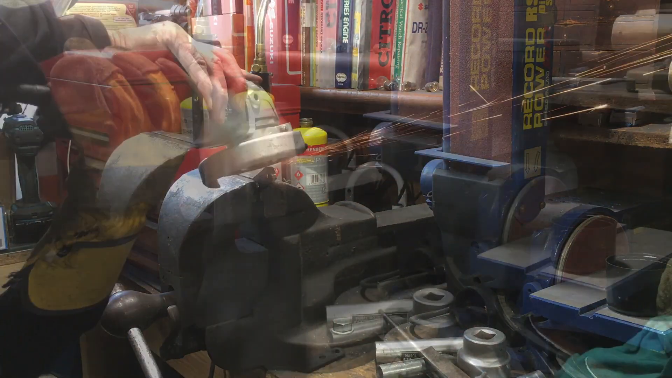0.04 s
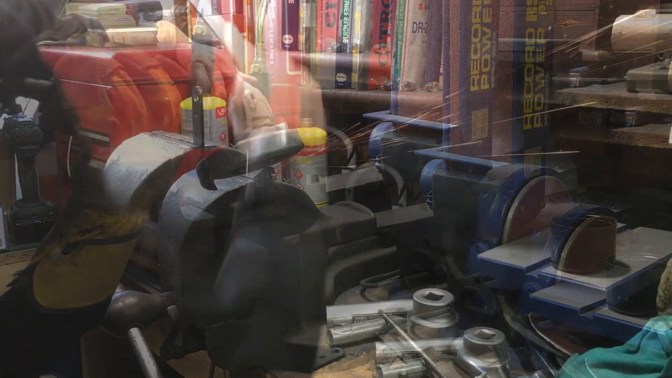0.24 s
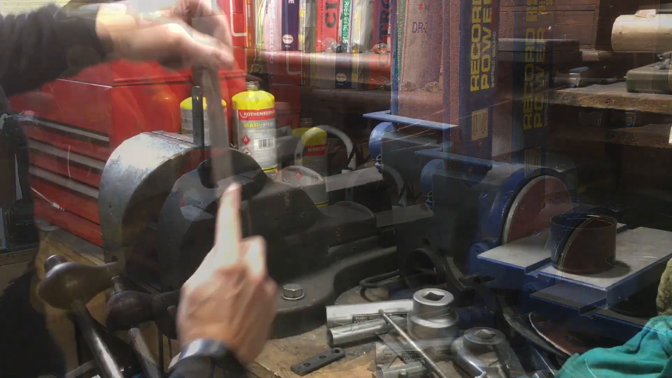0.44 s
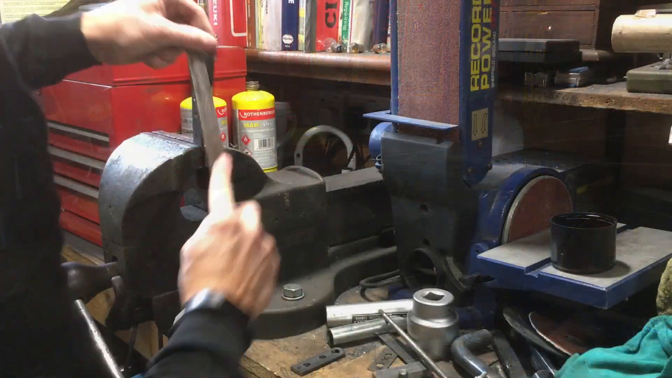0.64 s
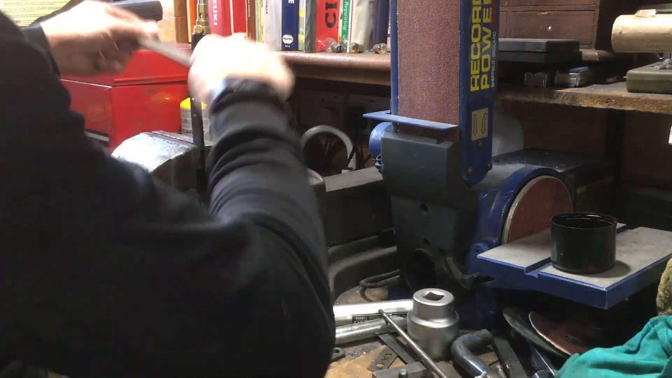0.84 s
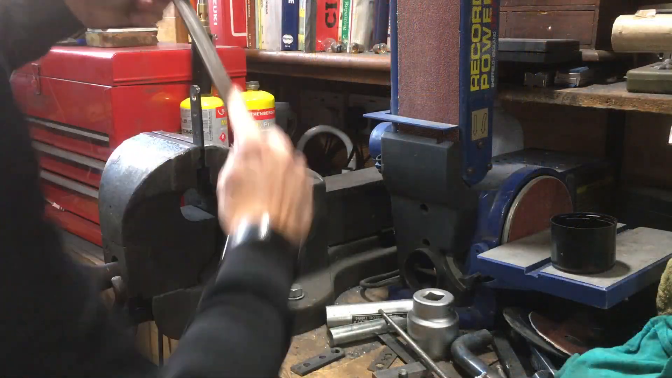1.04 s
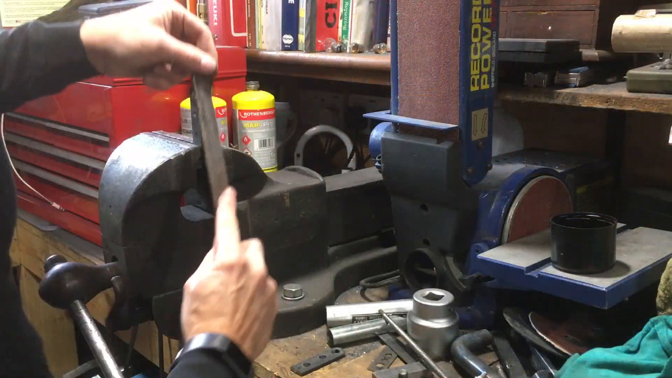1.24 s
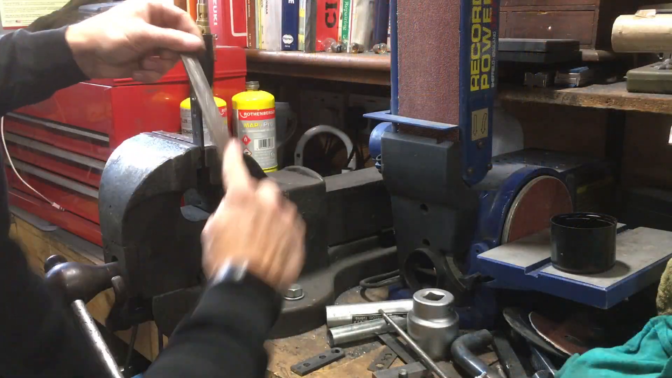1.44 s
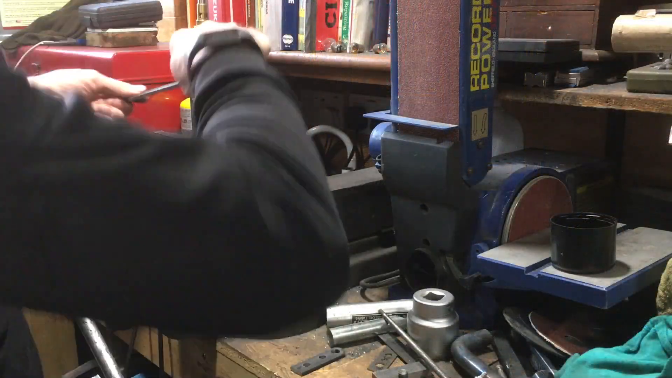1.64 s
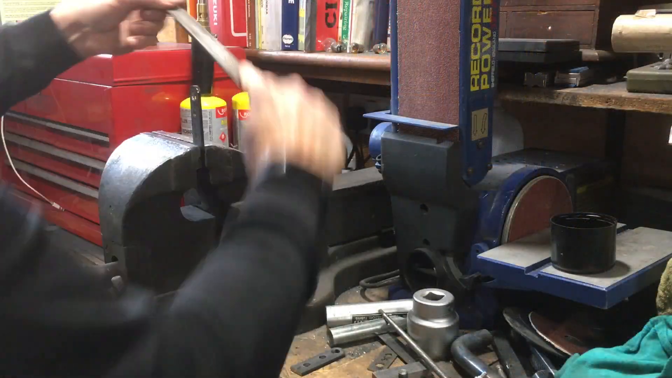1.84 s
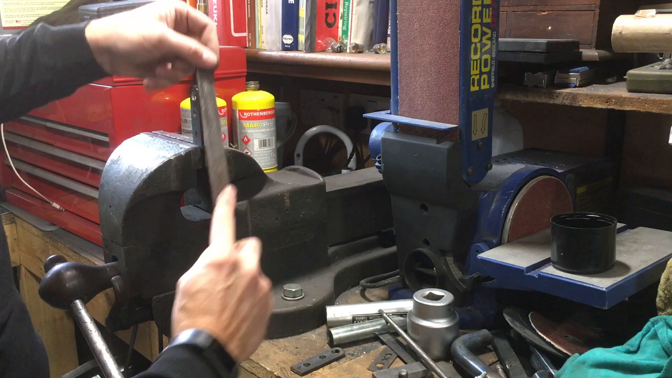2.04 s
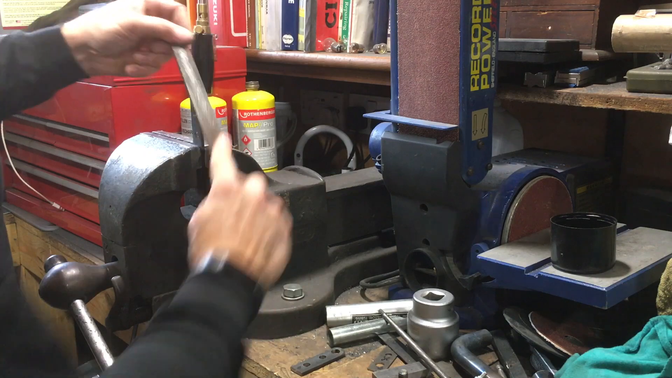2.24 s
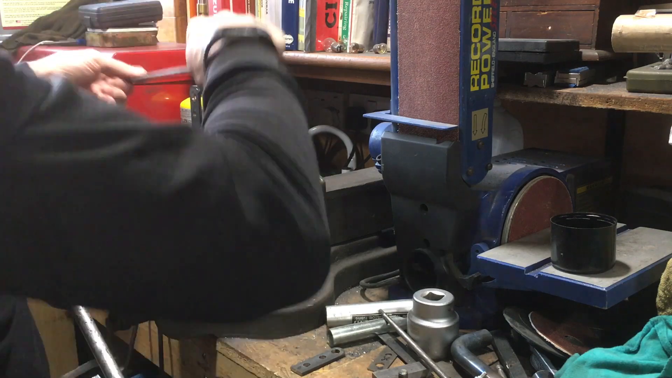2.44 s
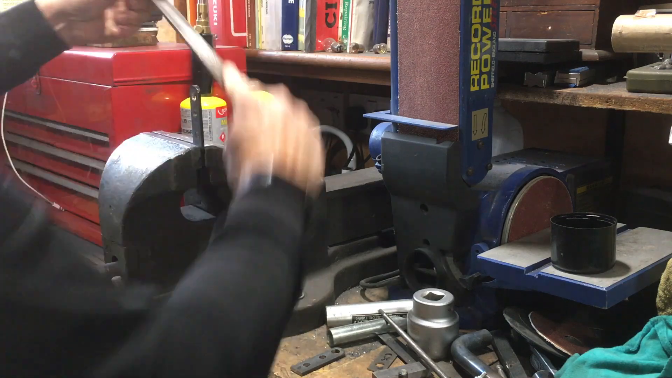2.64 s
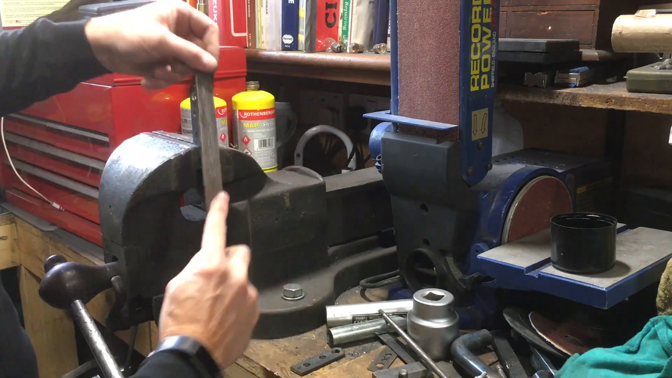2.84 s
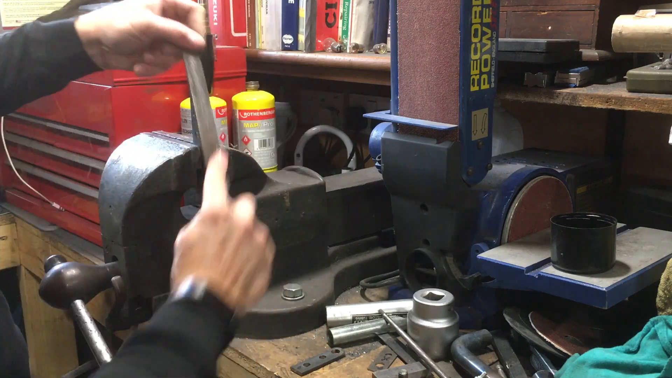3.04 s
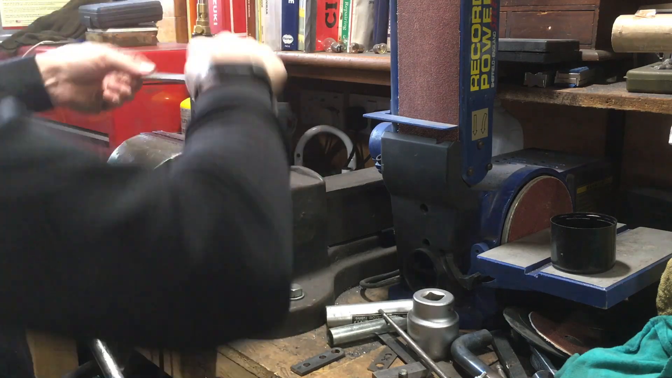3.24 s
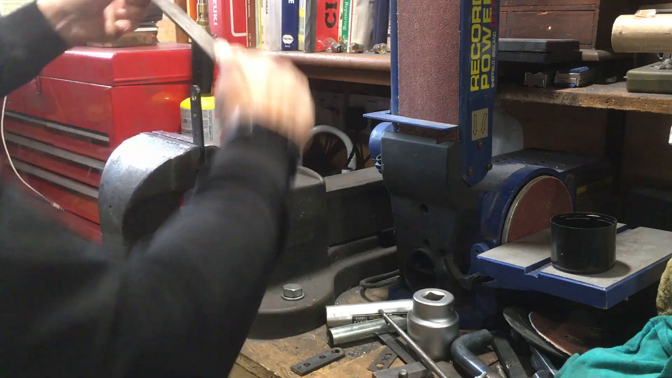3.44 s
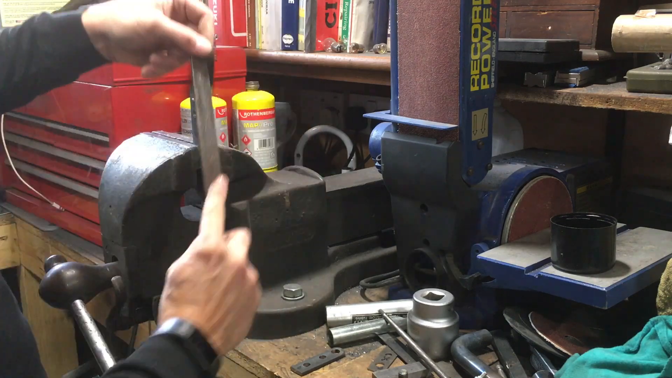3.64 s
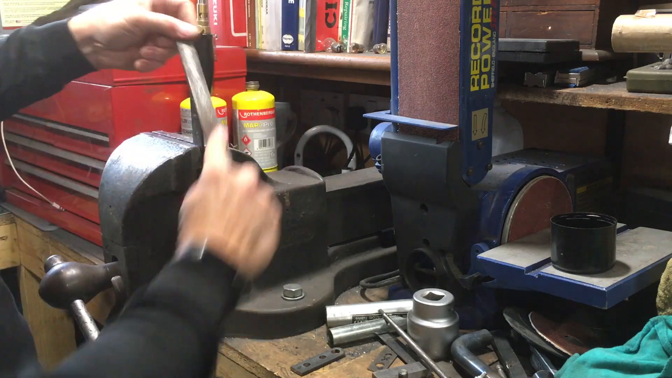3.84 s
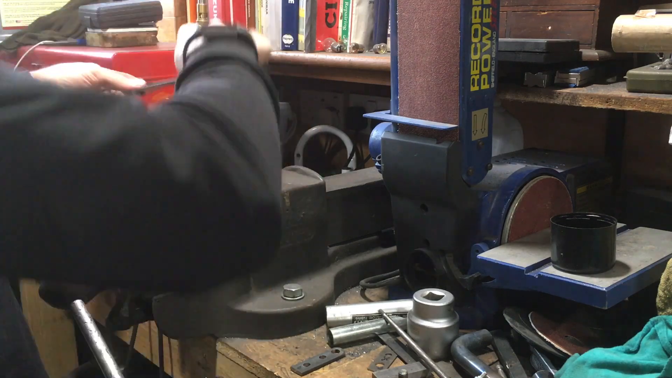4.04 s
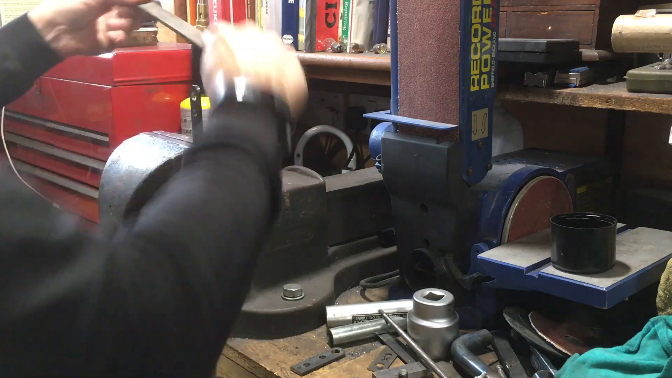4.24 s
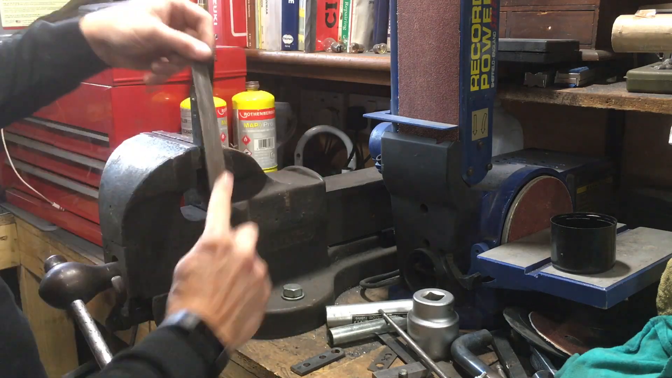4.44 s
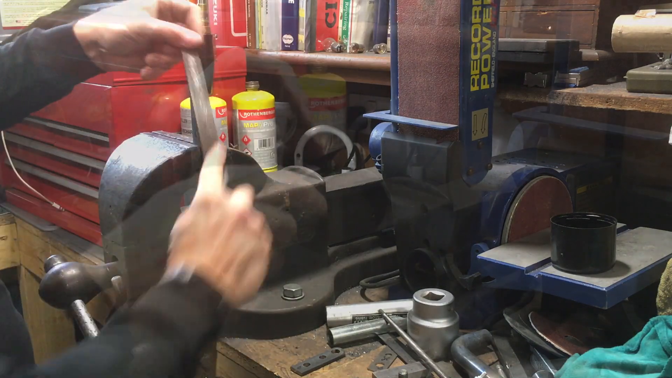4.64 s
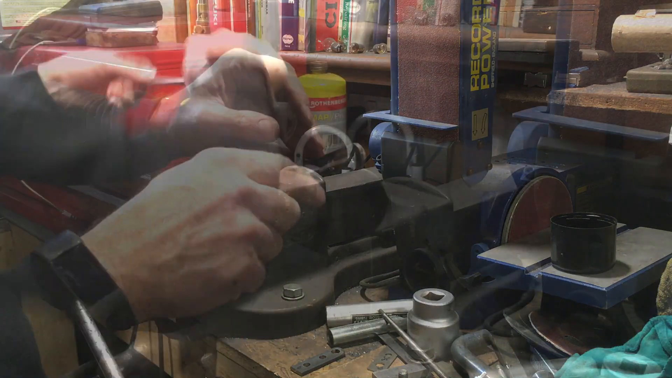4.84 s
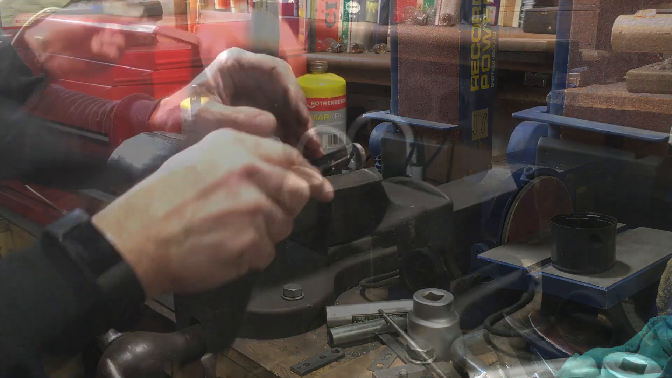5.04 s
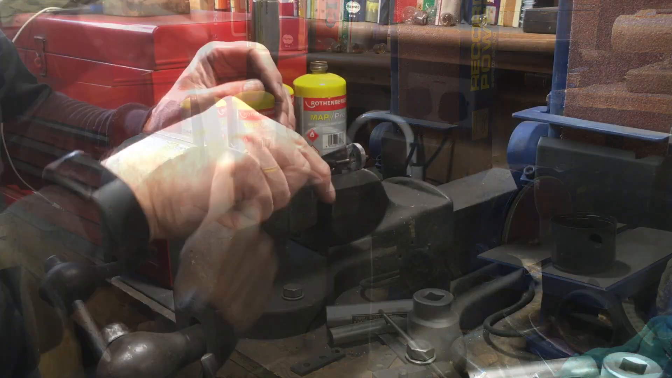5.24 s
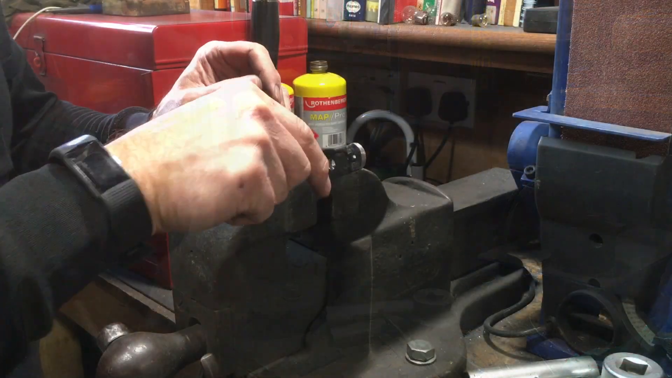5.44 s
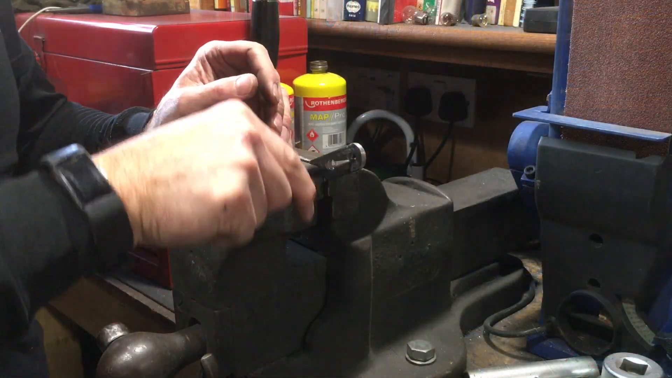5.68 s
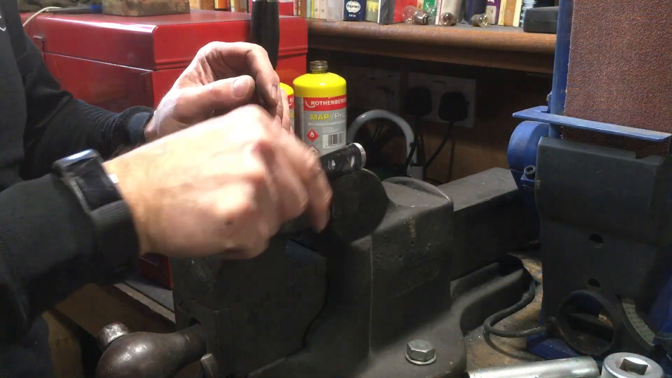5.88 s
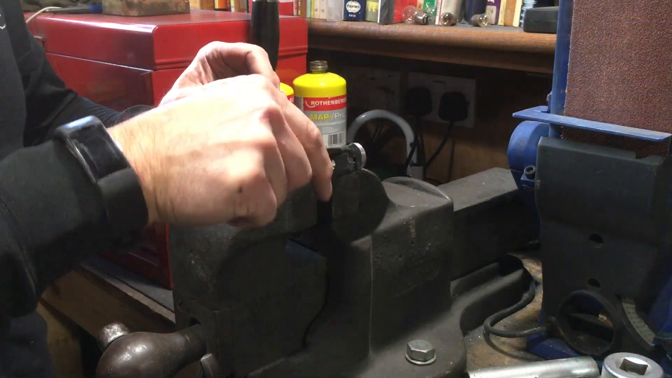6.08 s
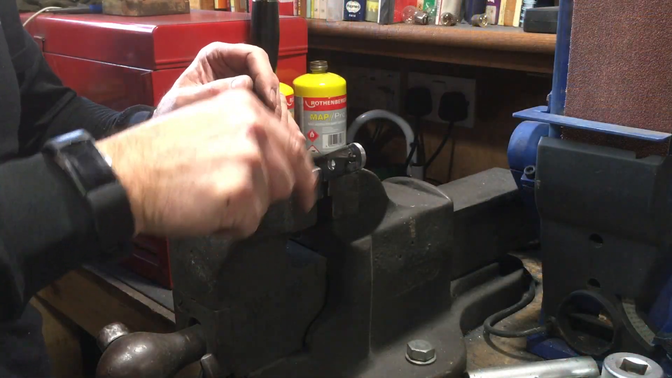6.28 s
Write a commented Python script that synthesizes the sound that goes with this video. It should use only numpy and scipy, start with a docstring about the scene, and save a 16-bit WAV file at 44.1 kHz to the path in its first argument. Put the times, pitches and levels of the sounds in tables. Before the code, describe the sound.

An angle grinder whines and chatters on steel and fades within the first second. A hand file then makes six evenly paced strokes on a bracket held in a vice, each clacking down, rasping louder and ending in a short squeal and faint ring. Finally a small metal part scrapes and clicks against the bracket. The sound is close, in a small workshop with a low hum.

```python
"""An angle grinder chatters on a steel bracket in a vice and fades, its grit cutting, its gears whining.
A hand file then makes six strokes: it clacks down, rasps as its teeth tear chips, squeals by friction
near the end and rings in its own modes as it lifts. Last, a small metal part scrapes and clicks against
the bracket by stick and slip. The bench sways under the work, and the small workshop hums throughout."""
import sys
import numpy as np
from scipy import signal
from scipy.fft import rfft, irfft
from scipy.io import wavfile
from scipy.ndimage import uniform_filter1d, map_coordinates

SR = 44100
rng = np.random.default_rng(int(sys.argv[2]) if len(sys.argv) > 2 else 0)


def store_wav(level_fs):
    """Save 16-bit WAV to argv[1]."""
    pcm = np.round(np.clip(np.atleast_2d(level_fs), -1, 1) * 32767)
    wavfile.write(sys.argv[1], SR, pcm.T.astype(np.int16))


N = 278271
TIME = np.arange(N) / SR


def amp(db):
    """Amplitude ratio of a level in decibels."""
    return 10 ** (np.asarray(db) / 20)


def unit(x):
    """Normalisation to an rms of one."""
    return x / np.sqrt(np.mean(x ** 2) + 1e-20)


def level(curve):
    """Envelope interpolated in decibels, silent outside the curve."""
    times, db = np.transpose(curve)
    return amp(np.interp(TIME, times, db, left=-150, right=-150))


def swell(s, rise_s, fall_s):
    """Exponential growth to one at time s, then decay; an infinite rise_s holds one until then."""
    return np.exp(np.maximum(np.minimum((TIME - s) / rise_s, (s - TIME) / fall_s), -30))


def ramp(s, rise_s):
    """Gaussian onset from rest to one."""
    return 1 - np.exp(-np.clip((TIME - s) / rise_s, 0, 5) ** 2)


def add(mix, s, sound):
    """Superposition of a sound from time s onward."""
    part = mix[max(round(s * SR), 0):][:len(sound)]
    part += sound[:len(part)]


def drift(hz):
    """Random fluctuation: low-passed noise of rms one."""
    f = np.fft.rfftfreq(N, 1 / SR)
    return unit(irfft(rfft(rng.standard_normal(N)) / (1 + (f / hz) ** 4), N))


def colour(x, spectrum, modes=(), tilt_db=0, size=8192):
    """Minimum-phase filter of unit energy: a smooth spectrum, a tilt per octave and resonant peaks."""
    f = np.fft.rfftfreq(size, 1 / SR) + 1
    hz, db = np.transpose(spectrum)
    db = np.interp(np.log(f), np.log(hz), db) + tilt_db * np.log2(np.maximum(f, hz[1]))
    for centre, width, height in modes:
        db = db + height / (1 + (2 * (f - centre) / width) ** 2)
    log_gain = np.log(amp(np.r_[db, db[-2:0:-1]]))
    taps = np.fft.ifft(np.exp(np.conj(signal.hilbert(log_gain)))).real[:size // 2]
    return signal.oaconvolve(x, taps / np.linalg.norm(taps))[:len(x)]


def resonate(x, hz, width):
    """Forced resonance: a double pole whose frequency may glide; rms one."""
    carrier = np.exp(2j * np.pi * np.cumsum(hz * np.ones(len(x))) / SR)
    pole = np.exp(-np.pi * width / SR)
    return unit((carrier * signal.lfilter([1], [1, -2 * pole, pole * pole], x / carrier)).real)


def saturate(x, knee):
    """Amplitude limiting: the envelope levels off above the knee; rms one."""
    return unit(x / (abs(signal.hilbert(x)) + knee))


def mottle(x, depth_db, patch_hz=500, patch_s=0.075):
    """Spectral modulation: as the contact shifts, patches of the spectrum swell and sink."""
    spectra = signal.stft(x, SR, nperseg=256)[2]
    field = rng.standard_normal(spectra.shape)
    spans = (patch_hz * 256 / SR, patch_s * SR / 128)
    for axis in (0, 1, 0, 1):
        field = uniform_filter1d(field, max(round(spans[axis]), 1), axis)
    gain = unit(amp(depth_db * unit(field)))
    return signal.istft(spectra * gain, SR, nperseg=256)[1][:N]


def chips(per_s, spread_db):
    """Shot noise: tiny fractures of metal click at random moments and in random sizes."""
    size = amp(spread_db * np.minimum(rng.exponential(1, N), 4))
    return unit(size * rng.standard_normal(N) * (rng.random(N) < per_s / SR))


def blow(decay_s, size=4096):
    """Impact: a decaying rattle with the energy of 10 ms at an rms of one."""
    burst = rng.standard_normal(size) * np.exp(-np.arange(size) / SR / decay_s)
    return burst / np.linalg.norm(burst) * np.sqrt(SR / 100)


def contact(decay_s, patchy_db=3.0):
    """Point excitation: a tiny blow, coloured at random as each point sounds different."""
    hz = np.linspace(300, 16000, 26)
    return colour(blow(decay_s), np.c_[hz, patchy_db * rng.standard_normal(len(hz))], size=1024)


def workshop(x, wet_db=-4, t60_low=0.2, t60_high=0.14):
    """Reverberation: close, crowded walls give dense reflections that die fast, the treble first."""
    hz, t, spectra = signal.stft(rng.standard_normal(SR // 2), SR, nperseg=256)
    absorption = amp(np.interp(hz, [200, 900], [-7, 0]))[:, None]  # shelves and panels soak up bass
    t60 = np.interp(hz, [500, 12000], [t60_low, t60_high])[:, None]
    tail = signal.istft(spectra * absorption * 1000 ** (-t / t60), SR, nperseg=256)[1]
    tail[:SR // 300] = 0  # the gap before the first reflection
    wet = signal.fftconvolve(x, tail / np.linalg.norm(tail))[:N]
    return (x + amp(wet_db) * wet) / np.hypot(1, amp(wet_db))


# The workshop air. Each row: frequency in Hz, relative density in dB.
AIR_SPECTRUM = [(20, 3.5), (45, 0), (108, 3.5), (150, -10.5), (230, -11.5), (400, -19.5), (1000, -24.5),
                (2500, -31.5), (6000, -35.5), (15500, -30.5)]
# The low hum. Each row: time in seconds, level in dB.
HUM_LEVELS = [(0, -65), (.5, -60.5), (1, -55.5), (4.6, -54), (5.3, -66.5), (6.3, -53)]
def room_tone(air_db=-61, hum_hz=73.2, hum_width=5):
    """Ambient noise: broadband air and a wavering narrow-band hum with its third harmonic."""
    fundamental = saturate(resonate(rng.standard_normal(N), hum_hz, hum_width), knee=.5)
    third = amp(-28) * resonate(rng.standard_normal(N), 3 * hum_hz, width=12)
    air = amp(air_db) * colour(rng.standard_normal(N), AIR_SPECTRUM)
    return air + (fundamental + third) * level(HUM_LEVELS)


# The hands bump the vice. Each row: start in seconds, level in dB.
VICE_BUMPS = [(5.48, -54), (6.075, -49.5), (6.26, -52.5)]
def bench(sway_hz=51, bump_hz=100, bump_width=50, bump_s=0.027, sway_share=0.8, lead_s=0.046):
    """Forced vibration: the bench sways most just before each lift of the file, and thuds when bumped."""
    sway = saturate(resonate(rng.standard_normal(N), sway_hz, width=30), knee=.8)
    pushes = sum(amp(sway_db) * swell(lift - lead_s, rise_s=0.092, fall_s=0.096)
                 for _, lift, *_, sway_db, _ in FILE_STROKES)
    bumps = sum(amp(db) * ramp(s, bump_s) * swell(s + 2 * bump_s, np.inf, bump_s) for s, db in VICE_BUMPS)
    thud = resonate(rng.standard_normal(N), bump_hz, bump_width)
    return sway * (pushes + sway_share * bumps) + thud * bumps


# The file is set down. Each row: time in seconds, level in dB, brightness in dB per octave.
FILE_LANDINGS = [(0.5963, -34, -0.2), (1.333, -34, -0.5), (2.1503, -36.5, 1), (2.9798, -46.5, -4),
                 (3.769, -40, -1), (4.5757, -42.5, -1.7)]
# It knocks in the hands on its way back. Each row: time in seconds, level in dB.
FILE_KNOCKS = [(1.0333, -70), (1.1257, -57), (1.964, -62), (2.7311, -64), (3.574, -62.5), (3.652, -69),
               (4.46, -61)]
# A sleeve brushes by. Each row: start in seconds, length in seconds, level in dB.
SLEEVE_BRUSHES = [(1.093, 0.077, -69.5), (1.782, 0.097, -69), (2.599, 0.057, -67.5), (3.586, 0.077, -68)]
# The spectra of these three sounds. Each row: frequency in Hz, relative density in dB.
CLACK_SPECTRUM = [(60, 1.5), (160, -3), (280, 2.5), (560, 6.5), (900, 2), (1700, 5.5), (2500, 2),
                  (4400, 1.5), (6500, 3), (8000, -12.5), (10500, -15), (13000, -2), (15500, -74)]
KNOCK_SPECTRUM = [(200, -24), (700, -10.5), (1200, -3), (1700, -3), (2500, -13.5), (3300, -12.5),
                  (6000, -56), (15000, -22)]
CLOTH_SPECTRUM = [(300, -13), (1050, 5.5), (2500, -2), (5000, -4), (9500, -1), (12000, -3), (15000, -3)]
def handling(tick_db=-9, tick_octaves=4.2):
    """Impact excitation: landings and knocks ring the vice and file; a sleeve adds friction noise."""
    out = np.zeros(N)
    for s, db, bright_db in FILE_LANDINGS:
        clack = colour(blow(decay_s=.008), CLACK_SPECTRUM, VICE_MODES, tilt_db=bright_db)
        add(out, s, amp(db) * clack)
        tick = colour(blow(decay_s=.0007), HISS_SPECTRUM)  # the teeth meet the edge first
        add(out, s, amp(db + tick_octaves * bright_db + tick_db) * tick)
    for s, db in FILE_KNOCKS:
        add(out, s, amp(db) * colour(blow(decay_s=0.0048), KNOCK_SPECTRUM, VICE_MODES))
    for s, length, db in SLEEVE_BRUSHES:
        window = np.hanning(int(length * SR))
        add(out, s, amp(db) * colour(rng.standard_normal(N)[:len(window)] * window, CLOTH_SPECTRUM))
    return out


# The small part rubs on the bracket. Each row: start in seconds, length in seconds, level in dB.
PART_RUBS = [(5.08, 0.021, -63.5), (5.135, 0.037, -58), (5.293, 0.015, -62), (5.321, 0.04, -59),
             (5.454, 0.033, -43.5), (5.505, 0.014, -49), (5.552, 0.041, -46), (5.62, 0.084, -45.5),
             (5.72, 0.062, -50.5), (5.775, 0.049, -42.5), (5.87, 0.089, -62), (5.918, 0.049, -51),
             (5.96, 0.039, -43), (6.034, .09, -49.5), (6.175, 0.051, -47), (6.243, .05, -48)]
# It catches and snaps free. Each row: time in seconds, level in dB, brightness in dB per octave.
PART_SNAPS = [(5.028, -59, 5), (5.462, -44, 0.5), (5.49, -38, 3.5), (5.562, -36, 1.5), (5.751, -46.5, 1),
              (5.783, -37, 3), (5.792, -32.5, 13), (5.806, -40, 1.5), (5.84, -44.5, 0.5), (6.066, -35, 2),
              (6.112, -45, 15), (6.127, -35, 5.5), (6.244, -34, 4), (6.26, -37.5, 1), (6.274, -37, 0)]
# Its spectrum. Each row: frequency in Hz, relative density in dB.
PART_SPECTRUM = [(100, 2.5), (400, 4.5), (1000, 4.5), (1700, 3.5), (2600, 8.5), (3200, 2.5), (5000, -7),
                 (5900, 1.5), (8000, -4), (9300, -1), (10500, -8.5), (12600, -3.5), (14000, -3),
                 (15600, -1)]
# Its resonances. Each row: frequency in Hz, width in Hz, height above the spectrum in dB.
PART_MODES = [(600, 80, 4), (865, 100, 10), (1140, 45, 9), (2230, 50, 13), (2650, 42, 11), (2855, 60, 11.5),
              (4390, 90, 9), (4650, 70, 13), (5950, 120, 8), (9760, 210, 4), (14500, 300, 12)]
def small_part(noise_db=-6, slips_per_s=75, points=10, attack_s=0.014, release_s=0.013):
    """Stick-slip friction: steel drags on steel in tiny slips at several points, at times snapping free."""
    slips = np.zeros(N)
    for _ in range(points):
        slips += signal.oaconvolve(chips(slips_per_s, spread_db=1.5), contact(decay_s=.0016))[:N]
    friction = unit(unit(slips) + amp(noise_db) * rng.standard_normal(N))
    friction = mottle(friction, depth_db=3, patch_hz=700, patch_s=.02)
    rubbing = sum(amp(db) * ramp(s, attack_s) * swell(s + length, np.inf, release_s)
                  for s, length, db in PART_RUBS)
    out = colour(friction * rubbing, PART_SPECTRUM, PART_MODES, tilt_db=0.2)
    for s, db, bright_db in PART_SNAPS:
        snap = contact(decay_s=.003, patchy_db=3.5)
        rise_s = .0014 * amp(-3 * max(bright_db, 0))  # dull slips build up, bright ones break at once
        snap = snap * (1 - np.exp(-np.arange(len(snap)) / SR / rise_s))
        add(out, s - rise_s / 2, amp(db) * colour(snap, PART_SPECTRUM, PART_MODES, tilt_db=bright_db))
    return out


# The grinder's fade, and the wheel's hardest bites. Each row: time in seconds, level in dB.
GRINDER_LEVELS = [(0, -32), (.13, -36.5), (.24, -40.5), (.5, -47.5), (.7, -64)]
WHEEL_BITES = [(0.095, -41), (0.125, -39), (.158, -37.5), (.203, -37.5), (.228, -37), (.251, -43),
               (0.28, -42), (0.301, -46), (0.323, -41), (.345, -43), (0.377, -43), (0.407, -44)]
# The cutting grit. Each row: frequency in Hz, relative density in dB.
GRIT_SPECTRUM = [(150, -23.5), (450, -14.5), (900, -9.5), (1450, -3.5), (1900, -6.5), (2400, 2.5),
                 (3300, -1.5), (5000, -8.5), (6300, -7.5), (7900, -11), (9200, -1), (10400, -10.5),
                 (11700, -4), (14400, -7), (15500, -3)]
# The bracket under the wheel. Each row: frequency in Hz, width in Hz, relative level in dB.
BRACKET_MODES = [(2560, 430, -21), (6420, 810, 10.5), (9100, 240, 7), (11560, 320, 2), (15600, 500, -14)]
# Motor and gear whine. Each row: frequency in Hz, level against the grinding in dB.
WHINE_TONES = [(565, -22), (608, -24), (2062, -19), (2357, -17), (2408, -23), (3160, -16), (4522, -25),
               (6708, -19), (13416, -30)]
def grinder(turns_hz=181, throb=0.045, ring_db=1, bite_s=0.0028, chatter_per_s=30, chatter_db=-4):
    """Abrasion and chatter: grit cuts deeper once a turn, bounces ring the bracket, the gears whine."""
    fade = level(GRINDER_LEVELS)
    rotation = 1 + throb * np.sin(2 * np.pi * turns_hz * TIME)
    bounce_count = np.floor(np.cumsum(chatter_per_s * np.exp(.3 * drift(30))) / SR)
    bounces = amp(chatter_db) * np.diff(bounce_count, prepend=0) * fade * rng.uniform(.4, 1.4, N)
    for s, db in WHEEL_BITES:
        add(bounces, s - bite_s / 2, amp([db]))
    age = np.arange(SR // 10) / SR / bite_s
    bites = signal.oaconvolve(bounces, age * np.exp(1 - age))[:N]  # each peaks after bite_s
    cutting = mottle(chips(per_s=16000, spread_db=1.5) * rotation, depth_db=1.0, patch_s=.02)
    grit = colour(cutting, GRIT_SPECTRUM) * (fade + bites)
    ring = unit(sum(amp(db) * resonate(rng.standard_normal(N), hz, width)
                    for hz, width, db in BRACKET_MODES))
    speed = 1 + .0014 * drift(40)
    whine = sum(amp(db) * (1 + .6 * drift(42)) * np.sin(2 * np.pi * hz * np.cumsum(speed) / SR)
                for hz, db in WHINE_TONES)
    return grit + amp(ring_db) * ring * bites + whine * fade


# The free file's modes. Each row: frequency in Hz, relative level in dB, time to fall 60 dB in seconds.
FILE_MODES = [(563.3, -1.5, 0.6), (1530, -19, 0.32), (2110, -14, 0.16)]
def file_ring(clear_s=.007, attack_s=0.0025):
    """Free vibration: lifted clear, the file rings on in its own damped modes."""
    out, t = np.zeros(N), np.arange(SR) / SR
    ring = sum(amp(db) * 1000 ** (-t / t60) * np.sin(2 * np.pi * hz * t) for hz, db, t60 in FILE_MODES)
    for _, lift, *_, ring_db in FILE_STROKES:
        add(out, lift + clear_s, amp(ring_db) * ring * (1 - np.exp(-t / attack_s)))
    return out


# The file's strokes. Each row: push and lift in seconds; hiss, bite, growl, extra bite at the heel and
# squeal in dB; squeal build-up in seconds; squeal pitch in Hz; screech against the squeal, bench sway
# and final ring in dB.
FILE_STROKES = [ (0.599, 0.845, -48.5, -49.5, -44, 14.5, -36, 0.017, 2135, -6, -42.5, -44.5),
                (1.386, 1.657, -47.5, -43.5, -43, 3, -33.5, 0.036, 2068, -35, -47, -41.5),
                (2.18, 2.449, -47, -43.5, -42, 7.5, -30.5, 0.016, 2087, -38, -41.5, -57),
                (2.992, 3.3, -48, -41, -44, -1, -30.5, 0.025, 2086, -37, -43.5, -52),
                (3.786, 4.076, -46, -39.5, -41, 0.5, -30.5, 0.039, 2043, -25.5, -40, -51),
                (4.596, 4.917, -49.5, -44, -43.5, 1.5, -35, 0.036, 2057, -39, -47.5, -61)]
# The file nearly stalls once. The row: time in seconds, width in seconds, level change in dB.
FILE_STALL = (0.61, .014, -20)
def stroke_controls(speed_up_s=0.064, load_s=0.039, let_go_s=0.0056, heel_lead_s=0.01, heel_width_s=0.037):
    """Sliding friction: hiss follows speed, bite and growl follow load, and all grow as the hand leans in."""
    hiss_growth, bite_growth, growl_growth = 3, 36.8, 7  # dB per second
    gains, travel, pitch = np.zeros((5, N)), [], []
    stall_s, stall_width, stall_db = FILE_STALL
    stall = amp(stall_db * np.exp(-((TIME - stall_s) / stall_width) ** 2))
    for push, lift, *settings in FILE_STROKES:
        hiss_db, bite_db, growl_db, heel_db, squeal_db, build_s, hz, screech_db, *_ = settings
        to_go = np.clip(lift - TIME, 0, lift - push)
        touch = stall * swell(lift, np.inf, let_go_s)
        speed, load = touch * ramp(push, speed_up_s), touch * ramp(push, load_s)
        dig_db = heel_db * np.exp(-((to_go - heel_lead_s) / heel_width_s) ** 2)  # the heel digs in
        hiss = speed * amp(hiss_db - hiss_growth * to_go + .45 * dig_db)
        bite = load * amp(bite_db - bite_growth * to_go + dig_db)
        growl = load * amp(growl_db - growl_growth * to_go + 0.11 * dig_db)
        squeal = amp(squeal_db) * swell(lift, build_s, fall_s=.011)
        gains = gains + [hiss, bite, growl, squeal, amp(screech_db) * squeal]
        travel += [(push, 0), (lift + .035, 1)]  # from tip to heel
        pitch += [(push, hz), (lift - .06, hz + 35), (lift, hz), (lift + .035, hz)]
    return *gains, np.interp(TIME, *np.transpose(travel)), np.interp(TIME, *np.transpose(pitch))


# The teeth's high hiss, middle bite and low growl. Each row: frequency in Hz, relative density in dB.
HISS_SPECTRUM = [(3500, -20.5), (5200, 3), (6800, 5), (7900, -2.5), (9600, 5), (10400, -2.5), (11300, 4.5),
                 (12100, -1), (13200, 0.5), (14300, 0), (15200, 1.5)]
BITE_SPECTRUM = [(500, -26), (950, 8.5), (1200, 1.5), (1800, 6), (2450, 2.5), (3100, 6.5), (4300, -4),
                 (5000, -15.5), (7000, -36.5)]
GROWL_SPECTRUM = [(60, -12.5), (110, 1.5), (165, -11), (240, -4), (400, -5.5), (600, -6), (800, -15),
                  (1300, -16), (3000, -68.5)]
# Vice and file resonances. Each row: frequency in Hz, width in Hz, height above the spectrum in dB.
VICE_MODES = [(232, 29, 8), (349.5, 50, 7), (422.6, 47, 7.5), (565.3, 13.5, 10.5), (729, 160, 7.5),
              (1077, 55, 8), (1330, 81, 6.5), (1593, 150, 8.5), (1933, 95, 6.5), (2107, 93, 7.5),
              (2860, 89, 7.5), (3540, 44, 3.5), (4370, 420, 7.5)]
def filing(flex_db=-7, edge_db=-9, zing_db=-5, screech_hz=4550, judder=0.18, echo=0.19,
           flex_hz=(640, 450, 370, 330, 290), edge_hz=(13800, 13400, 12800), zing_hz=(3900, 3100, 2750),
           echo_s=(.0002, .00055)):
    """Forced resonance: tearing chips shakes vice and file, whose notes fall as more of it overhangs."""
    hiss, bite, growl, squeal, screech, travel, squeal_hz = stroke_controls()

    def along(values):
        """Linear interpolation from tip to heel."""
        return np.interp(travel, np.linspace(0, 1, len(values)), values)

    grip = np.exp(judder * drift(110))  # the teeth catch and let go
    teeth = mottle(chips(per_s=20000, spread_db=1.5) * grip, depth_db=2.2)
    edge = resonate(teeth, along(edge_hz), width=1000) * (.4 + travel)  # sings more towards the heel
    zing = resonate(teeth, along(zing_hz), width=300) * (1 - travel)  # the tip zings while it is short
    rasp = (colour(teeth, HISS_SPECTRUM) + amp(edge_db) * edge + amp(zing_db) * zing) * hiss
    rasp = rasp + colour(teeth * bite, BITE_SPECTRUM, VICE_MODES)
    delay = along(echo_s) * (1 + 0.26 * drift(6.8))
    reflection = map_coordinates(rasp, [(TIME - delay) * SR], order=3)
    rasp = (rasp + echo * reflection) / np.hypot(1, echo)  # an echo off the moving hand sweeps a comb
    body = colour(chips(per_s=4000, spread_db=-0.5) * grip * growl, GROWL_SPECTRUM, VICE_MODES)
    flex = amp(flex_db) * resonate(teeth, along(flex_hz), width=130) * growl
    heel = saturate(resonate(teeth, squeal_hz, width=145), knee=.6)  # friction limits the squeal's swing
    return rasp + body + flex + heel * squeal + resonate(teeth, screech_hz, width=350) * screech


def scene():
    """Superposition of all the sources in the room; the small part is closer, so it is drier."""
    work = workshop(grinder() + filing() + handling()) + workshop(small_part(), wet_db=-8)
    return (work + file_ring() + bench() + room_tone())[None]


def record(dry, cutoff_hz=15900):
    """Band limiting: a steep low-pass filter removes the highest treble."""
    taps = signal.firwin(511, cutoff_hz, window=("kaiser", 9), fs=SR)
    return signal.oaconvolve(dry, taps[None], "same")


dry = scene()
out = record(dry)
store_wav(out)
```